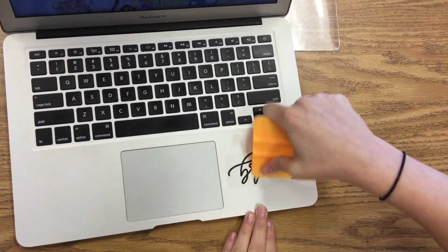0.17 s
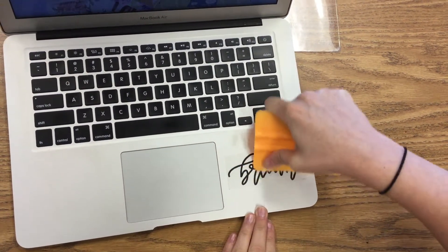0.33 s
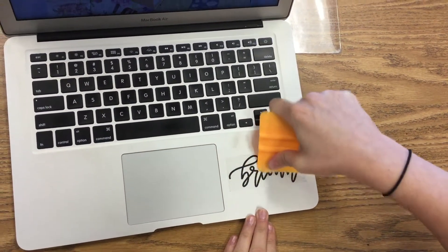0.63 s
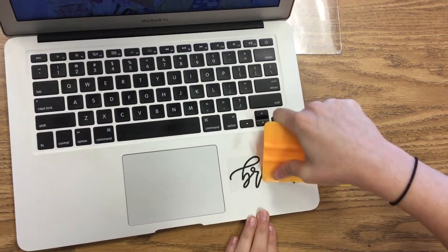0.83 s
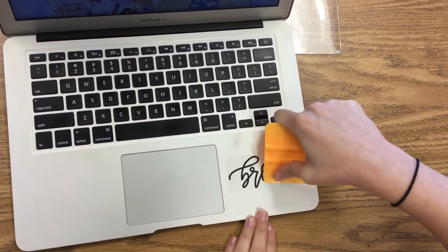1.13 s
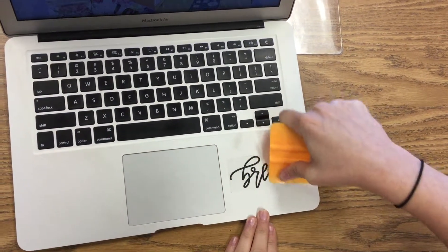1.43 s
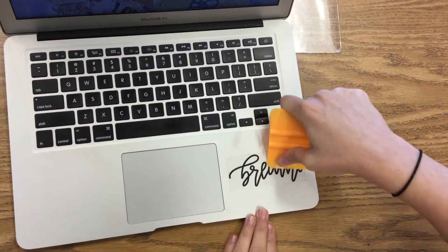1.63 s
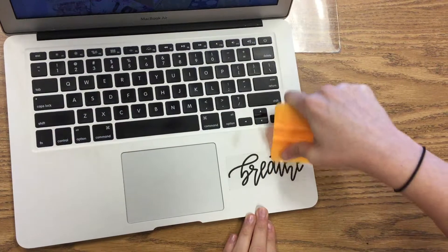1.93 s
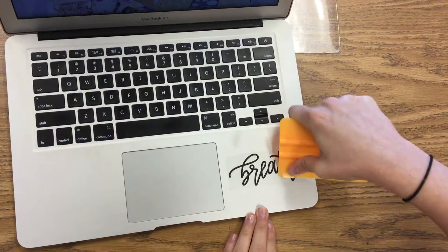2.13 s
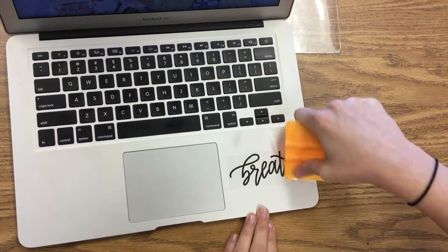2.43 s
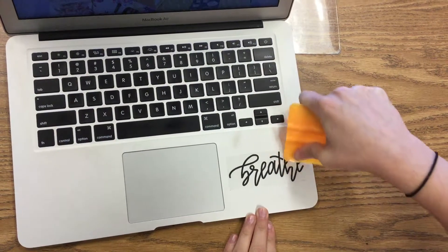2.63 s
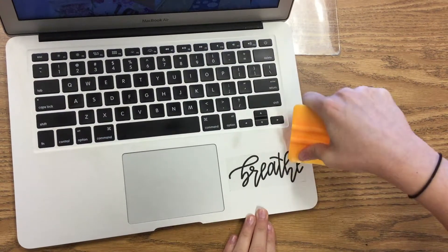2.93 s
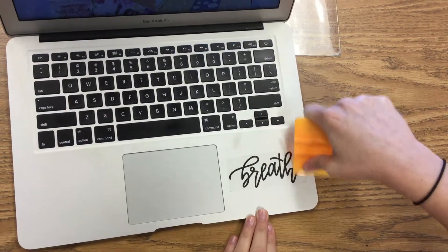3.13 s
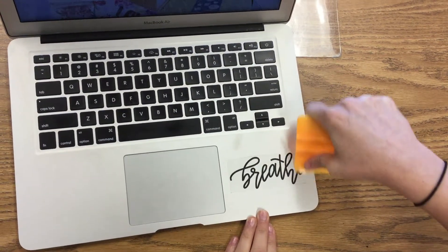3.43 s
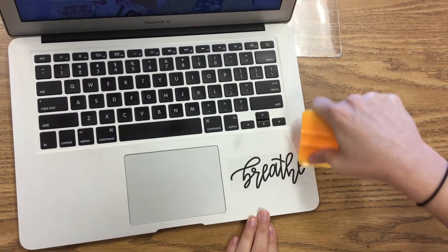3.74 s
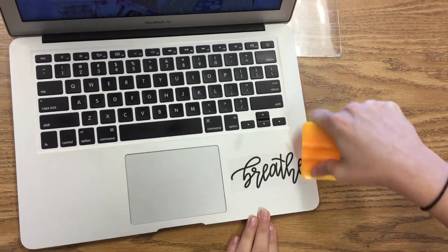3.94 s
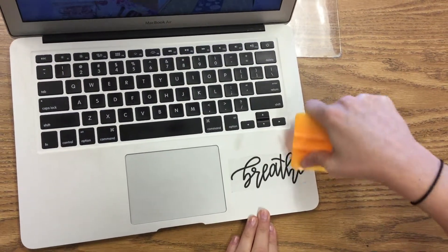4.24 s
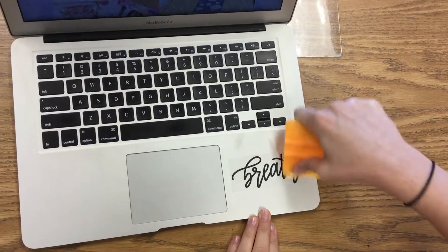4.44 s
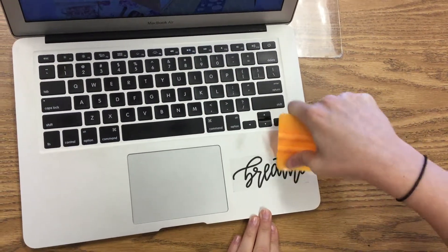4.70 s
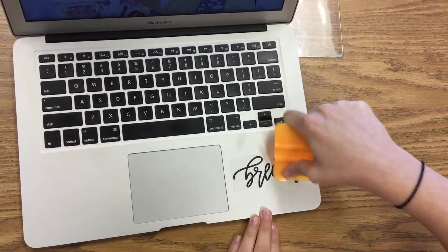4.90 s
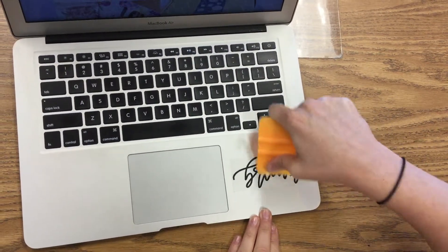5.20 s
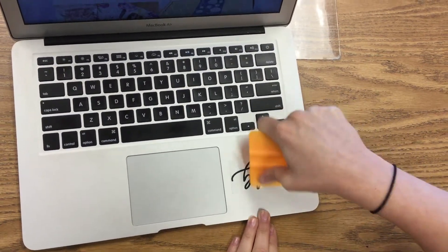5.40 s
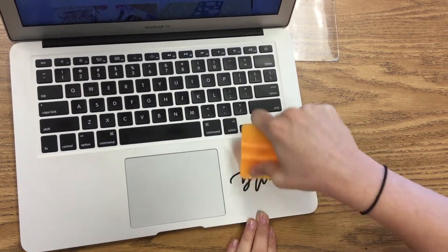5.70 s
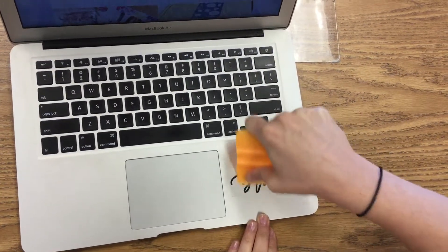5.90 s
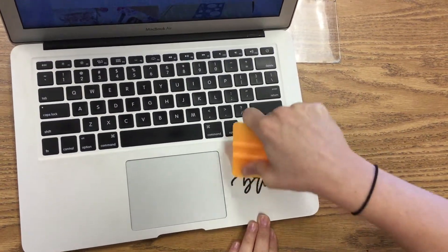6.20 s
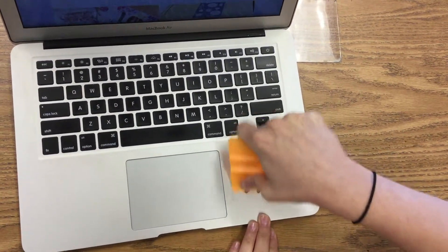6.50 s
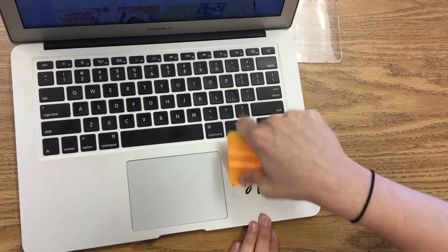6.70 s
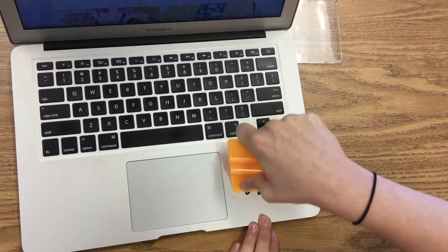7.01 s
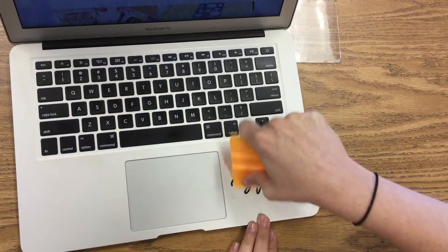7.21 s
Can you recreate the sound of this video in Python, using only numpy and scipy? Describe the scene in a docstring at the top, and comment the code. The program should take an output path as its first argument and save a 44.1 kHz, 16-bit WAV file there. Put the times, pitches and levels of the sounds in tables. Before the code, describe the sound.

Low ventilation rumbles steadily in a small room while a plastic card scrapes over sticker tape on a laptop in quick, uneven strokes. Brief, regular squeaks from the laptop's shell stand out above the soft rasping, along with two light taps and a few thin ticks of tape. The squeaks fade about two thirds of the way through, and firmer rubbing carries on to the end.

```python
"""Ventilation rumbles in a small room throughout. From the start a plastic squeegee card is rubbed
back and forth over transfer tape on a laptop's palm rest, about eight strokes a second: its edge
rasps over the tape's grain and rings the card. From 0.2 s to about 5 s the laptop squeaks under
load and its shell rings. From 0.6 s the tape ticks now and then; at 1.1 and 1.4 s the card taps
down lightly. The rubbing is hardest near 5.6 s and goes on to the end."""
import sys
import numpy as np
from scipy import signal
from scipy.fft import rfft, irfft
from scipy.io import wavfile
from scipy.ndimage import uniform_filter1d

SR = 44100
rng = np.random.default_rng(int(sys.argv[2]) if len(sys.argv) > 2 else 0)


def to_wav(sig):
    """Store sig (one row per channel, or 1-D mono) as 16-bit WAV at the path in sys.argv[1].

    Samples outside -1..1 are clipped; the rate is SR.
    """
    pcm = np.clip(np.atleast_2d(sig), -1, 1) * 32767
    pcm = np.round(pcm).astype(np.int16)
    wavfile.write(sys.argv[1], SR, pcm.T)  # frames by channels


N = 324128
FREQS_HZ = np.maximum(np.fft.rfftfreq(N, 1 / SR), 1)
USUAL_STROKE_DB = -68
# squeaks of the laptop under load: (time [s], level [dB])
SQUEAKS = [(.2000, -46.5), (.4860, -44.5), (0.7688, -42.5), (1.0496, -41.5), (1.3384, -35.5),
           (1.6359, -35.5), (1.9513, -40.5), (2.2738, -42), (2.6142, -43), (2.9475, -44), (3.2572, -41),
           (3.571, -45.5), (3.8762, -45), (4.1738, -46), (5.1241, -52.5)]


def undb(db):
    """Decibels to gain."""
    return 10 ** (np.asarray(db) / 20)


def unit(x):
    """Scale to rms 1."""
    return x / np.sqrt(np.mean(x ** 2))


def shaped(x, gain):
    """Filter by a gain per frequency."""
    return irfft(rfft(x) * gain, N)


def colour(points):
    """Gain per frequency from (frequency [Hz], level [dB]) points."""
    hz, db = np.transpose(points)
    return undb(np.interp(np.log(FREQS_HZ), np.log(hz), db))


def band(lo_hz, hi_hz, order=8):
    """Band-pass gain per frequency."""
    return ((1 + (lo_hz / FREQS_HZ) ** (2 * order)) * (1 + (FREQS_HZ / hi_hz) ** (2 * order))) ** -.5


def walk(rate_hz):
    """Slewed random steps, rms 1."""
    hold = int(SR / rate_hz)
    steps = np.repeat(rng.standard_normal(N // hold + 1), hold)
    return unit(uniform_filter1d(steps, hold)[:N])


def add(track, at_s, sound):
    """Mix a sound into a track."""
    i = max(int(at_s * SR), 0)
    track[i:i + len(sound)] += sound[:N - i]


def ringing(modes, t, rise_s):
    """Modes that build up briefly and die away."""
    ring = sum(undb(db - 60 * t / t60_s) * np.sin(2 * np.pi * (hz * t + rng.random()))
               for hz, db, t60_s in modes)
    return ring * (1 - np.exp(-t / rise_s))


def ventilation(rumble_db=-49.2, air_db=-72.3, swell_share=.7, flutter_db=1.3):
    """A wavering duct rumble under a soft hiss of air."""
    # spectra: (frequency [Hz], relative density [dB])
    rumble_spectrum = [(22, -33), (38, -16.5), (50, -5.5), (66, -0.5), (82, -5.5), (104, 1.5), (130, .5),
                       (160, -8.5), (182, -5), (222, -9.5), (260, -16), (340, -21.5), (450, -33)]
    air_spectrum = [(300, -6), (450, 1.5), (680, 4), (900, -2.5), (1400, -3.5), (2000, -17), (3000, -15.5),
                    (4600, -17.5), (6500, -20.5), (10000, -21.5), (15500, -27.5)]
    # rumble's swell, before centring and scaling: (time [s], level [dB])
    swell = [(0, -50.5), (0.9, -50.5), (1.4, -48.0), (1.7, -48.0), (2.1, -51.0), (2.45, -47.0),
             (2.85, -49.5), (3.2, -47.5), (4.0, -49.0), (4.55, -47.5), (4.85, -52.0), (5.7, -49.0),
             (6.1, -49.0), (6.9, -49.5), (7.15, -48.0), (7.35, -48.5)]
    times_s, db = np.transpose(swell)
    swell_db = swell_share * np.interp(np.arange(N) / SR, times_s, db - db.mean())
    waver_db = swell_db + flutter_db * walk(rate_hz=20)
    rumble = unit(shaped(rng.standard_normal(N), colour(rumble_spectrum) * band(26, 420)))
    air = unit(shaped(rng.standard_normal(N), colour(air_spectrum) * band(300, 16000)))
    return rumble * undb(rumble_db + waver_db) + air * undb(air_db)


def friction(catches_per_s=2500, spread_db=3.5, catch_gain=.42, tremble_db=.8):
    """The edge catches on the tape's grain: tiny uneven slips over hiss, under trembling pressure."""
    catches = (rng.random(N) < catches_per_s / SR) * rng.choice([-1, 1], N)
    sizes = undb(spread_db * np.minimum(rng.exponential(size=N), 5))
    grain = rng.standard_normal(N) + catch_gain * unit(catches * sizes)
    return grain * undb(tremble_db * walk(rate_hz=260))


def stroke_tone(at_s, db, push, body_lag=.3, edge_lag=.2, push_body_db=1.2, push_edge_db=-.8):
    """Body and edge offsets [dB]: both lag the rasp under pressure; a push rings more, hisses less."""
    # tone as the blade crosses the palm rest: (time [s], card body [dB], edge hiss [dB])
    tone = [(0.1, 3.5, -5.5), (.6, 6.3, -4), (1.75, 2.5, -6), (2.0, 0, -2.5), (2.6, -3, -3.5),
            (3.1, -1, -1.5), (3.6, -1.5, -2), (3.8, -2, 3), (4.07, -.5, 3), (4.44, -4.5, -4),
            (5.16, 1.5, -6), (5.42, -1, -6), (5.7, -1, -4), (6.0, -2.5, -9), (6.8, 0, -7), (7.3, -1, -9)]
    times_s, body_db, edge_db = np.transpose(tone)
    harder_db = db - USUAL_STROKE_DB
    return (np.interp(at_s, times_s, body_db) - body_lag * harder_db + push_body_db * push,
            np.interp(at_s, times_s, edge_db) - edge_lag * harder_db + push_edge_db * push)


def card_gain(modes, floor_db, freqs_hz, widen=1.57, detune=.012, contact_db=2.0):
    """The card's resonances; each stroke lands differently, which shifts and reweights them."""
    hz, width_hz, db = np.transpose(modes)
    shift, weight = rng.standard_normal((len(modes), 2)).T
    offset = (freqs_hz[:, None] - hz * (1 + detune * shift)) / (widen * width_hz / 2)
    peaks = undb(db + contact_db * weight) / (1 + offset ** 2)
    return np.sqrt(undb(floor_db) ** 2 + np.sum(peaks ** 2, axis=1))


def stroke_speed(length_s, db, rise_share, drag_share_per_db=.014):
    """The hand speeds up and slows between turning points; drag delays a hard stroke's peak."""
    fastest = np.clip(rise_share + drag_share_per_db * (db - USUAL_STROKE_DB), .1, .9)
    progress = np.linspace(0, 1, int(length_s * SR))
    return np.sin(np.interp(progress, [0, fastest, 1], [0, np.pi / 2, np.pi]))


def screen_echo(x, direction, path_s=.001096, travel_s=.00018, gain=.5):
    """The open screen mirrors the scrape; the path changes as the blade moves, so the colour glides."""
    i = np.arange(len(x))
    lag_s = path_s * rng.uniform(.783, 1.207) + direction * travel_s * np.cos(np.pi * i / len(x)) / 2
    return (x + gain * np.interp(i - lag_s * SR, i, x)) / np.hypot(1, gain)


def squeegee(edge_late_share=.04):
    """Friction rings the card; edge hiss grows faster with speed than the body and peaks later."""
    # draws and pushes in turn, two jerks in the hardest push: (start [s], length [s], level [dB])
    strokes = [(.064, .072, -69.5), (.206, .107, -69), (.315, .117, -70), (.488, .094, -67),
               (.629, .097, -69), (.815, .076, -72.5), (.954, .125, -80), (1.133, .08, -71),
               (1.26, .089, -71.5), (1.432, .102, -69.5), (1.594, .088, -68), (1.77, .113, -73.5),
               (1.949, .08, -66.5), (2.051, .146, -73), (2.25, .075, -69.5), (2.409, .11, -66.5),
               (2.582, .082, -65), (2.716, .1, -68.5), (2.898, .083, -69.5), (3.035, .096, -67.5),
               (3.205, .08, -67.5), (3.333, .096, -68), (3.476, .075, -75.5), (3.629, .081, -75),
               (3.757, .089, -71.5), (3.882, .09, -65.5), (4.013, .084, -71.5), (4.139, .088, -66.5),
               (4.243, .095, -78), (4.403, .083, -59.5), (4.478, .09, -69.5), (4.64, .052, -73.5),
               (4.743, .071, -79), (4.879, .079, -63.5), (4.977, .091, -75.5), (5.135, .082, -69),
               (5.233, .097, -77), (5.381, .08, -58.6), (5.467, .099, -69), (5.63, .078, -58.5),
               (5.677, .027, -56), (5.712, .029, -59.5), (5.728, .066, -62), (5.861, .074, -67),
               (5.96, .09, -71), (6.085, .091, -61), (6.188, .08, -64), (6.303, .092, -64),
               (6.407, .083, -67), (6.533, .083, -60), (6.621, .098, -69.5), (6.76, .083, -63.5),
               (6.872, .089, -66.5), (6.994, .086, -64), (7.131, .062, -70.5), (7.254, .068, -62.5)]
    # card modes by how it bears on the palm rest: (frequency [Hz], nominal width [Hz], level [dB])
    card_flat = [(1750, 650, -4.5), (2150.0, 160, 1.8), (2650, 450, -7.5), (3140, 120.0, -11.5),
                 (3940, 250.0, -11), (4260, 960, -12.5), (5700, 470, -12.5), (8080, 670, -15),
                 (9120.0, 380.0, -16), (11740, 790, -19.5), (15620.0, 3080.0, -18.5)]
    card_at_rim = [(2430, 290, -5.5), (3630, 480, -5.5), (4530, 290, -5.5), (5060, 240, -4),
                   (6240, 310, -5.5), (8200, 320.0, -3), (11500, 590.0, -7.5), (13120.0, 830.0, -7.5),
                   (14770.0, 1000, -8)]
    card_pressed = [(1050, 390, -8), (2110, 400, -2.5), (2780, 230, -3.5), (3410, 210, -1.7),
                    (4220, 490, -0.0), (5330, 500, -4), (5930, 450, -7), (7510.0, 840, -14.5),
                    (8900, 490.0, -9), (12100, 810, -14), (14980.0, 1540.0, -16.4)]
    card_upright = [(1160, 350, -7.5), (1690, 430, -6), (2196, 190, -4.5), (2730, 140, 1),
                    (3695, 560, -0.3), (5050, 130, -3.5), (5660, 540, -6), (7200.0, 330.0, -11),
                    (8230.0, 210.0, -18), (9170, 890.0, -14), (12300, 1380.0, -22)]
    # (start [s], card modes, unresonant floor [dB], rise [share of a usual stroke])
    grips = [(0, card_flat, -23, .61), (2.22, card_at_rim, -11.5, .53),
             (4.37, card_pressed, -17, .38), (5.83, card_upright, -19, .56)]
    out, drive = np.zeros(N), friction()
    freqs_hz = np.fft.rfftfreq(N // 32, 1 / SR)
    bands = band(923, 2847), band(2890, 6800), band(6780, 17000)  # body, rasp, edge
    registers = [np.interp(freqs_hz, FREQS_HZ, gain) for gain in bands]
    for k, (start_s, length_s, db) in enumerate(strokes):
        middle_s = start_s + length_s / 2
        push = 1 if k % 2 else -1
        _, modes, floor_db, rise_share = [grip for grip in grips if grip[0] <= middle_s][-1]
        body_db, edge_db = stroke_tone(middle_s, db, push)
        card = card_gain(modes, floor_db, freqs_hz)
        speed = stroke_speed(length_s, db, rise_share)
        edge_speed = stroke_speed(length_s, db, rise_share + edge_late_share)
        grain = drive[int(start_s * SR):][:len(speed)]
        swells = (undb(body_db - 1) * speed ** .79,
                  undb(-.03) * speed ** 1.23,
                  undb(edge_db + .04) * edge_speed ** 1.43)
        rings = [np.fft.fftshift(irfft(unit(card * register ** 2))) for register in registers]
        scrape = sum(swell * signal.fftconvolve(grain, ring, "same")
                     for swell, ring in zip(swells, rings))
        add(out, start_s, undb(db) * screen_echo(scrape, -push))
    return out


def squeaks(slip_trim_db=-1.2, ring_trim_db=-.3, ring_delay_s=.001003, vary_db=1):
    """Under load the laptop slips twice in about 10 ms; its shell rings on."""
    # tones of one squeak: (delay [s], length [s], pitch [Hz], level [dB])
    slips = [(0, .0065, 1418, -6), (.004, 0.00814, 1440, -.5), (.0048, .005, 1340, -6),
             (-.0006, 0.0046, 2498, -15), (0.0042, 0.0088, 870, -18.5)]
    # (frequency [Hz], level [dB], t60 [s])
    shell_modes = [(350, -30, 0.11), (481, -26, 0.11), (622, -27, 0.12), (900, -32, 0.12),
                   (1216, -17, 0.12), (1324, -21, 0.14), (1674, -30, 0.054), (2130, -32, 0.067),
                   (3500, -27, 0.043), (4260, -24, 0.041), (4540, -27.5, 0.057), (4750, -27, .035)]
    out, t = np.zeros(N), np.arange(SR // 8) / SR
    for at_s, db in SQUEAKS:
        pitch_ratio = 1 + .008 * rng.standard_normal()
        for delay_s, length_s, hz, slip_db in slips:
            swell = np.sin(np.pi * np.minimum(t / length_s, 1)).clip(0) ** .61
            gain = undb(db + slip_db + slip_trim_db + vary_db * rng.standard_normal())
            add(out, at_s + delay_s, gain * swell * np.sin(2 * np.pi * hz * pitch_ratio * t))
        add(out, at_s + ring_delay_s, undb(db + ring_trim_db) * ringing(shell_modes, t, rise_s=.002))
    return out


def shudder(trim_db=-27.8, t60_s=.4, rise_s=.005):
    """Each squeak stirs low modes of laptop and desk, too dense to hear apart."""
    swell, t = np.zeros(N), np.arange(SR // 3) / SR
    for at_s, db in SQUEAKS:
        add(swell, at_s, undb(db + trim_db - 60 * t / t60_s) * (1 - np.exp(-t / rise_s)))
    spectrum = band(400, 1500, order=4) / np.sqrt(FREQS_HZ)
    return swell * unit(shaped(rng.standard_normal(N), spectrum))


def tape_ticks(trim_db=-3, decay_s=.0014):
    """The sticky tape lets go in thin, bright ticks."""
    # (time [s], level [dB])
    releases = [(0.594, -63), (1.362, -51), (1.5349, -58), (1.8612, -57), (5.476, -61), (7.0863, -58)]
    out, t = np.zeros(N), np.arange(SR // 50) / SR
    for at_s, db in releases:
        add(out, at_s, undb(db + trim_db) * np.exp(-t / decay_s) * rng.standard_normal(len(t)))
    return shaped(out, band(7000, 15000, order=2))


def card_taps():
    """As the hand turns, the card drops onto the palm rest and rings briefly."""
    # (time [s], level [dB])
    taps = [(1.096, -70), (1.396, -57.5)]
    # (frequency [Hz], level [dB], t60 [s])
    card_modes = [(740, 4, .03), (1800, -9, .02), (2360, -3.5, 0.095), (2480, -7, .05)]
    out, t = np.zeros(N), np.arange(SR // 8) / SR
    for at_s, db in taps:
        add(out, at_s, undb(db) * ringing(card_modes, t, rise_s=.0006))
    return out


def room(x, wet_db, t60_s=.33, gap_s=.0081, dull_hz=7000):
    """Diffuse reflections of a small room, duller than the direct sound."""
    t = np.arange(SR // 2) / SR
    tail = rng.standard_normal(len(t)) * undb(-60 * t / t60_s) * (t > gap_s)
    wet = signal.fftconvolve(x, tail / np.linalg.norm(tail))[:N]
    return undb(wet_db) * shaped(wet, band(100, dull_hz, order=1))


def scene():
    """Mono mix; the shell spreads more into the room than the blade does."""
    blade = squeegee() + card_taps() + tape_ticks()
    shell = squeaks() + shudder()
    return (blade + room(blade, wet_db=-15.5) + shell + room(shell, wet_db=-14.5) + ventilation())[None]


def record(dry):
    """Steep low-pass."""
    top_hz = 15750
    return signal.sosfilt(signal.ellip(12, .1, 70, top_hz, fs=SR, output="sos"), dry)


dry = scene()
out = record(dry)
to_wav(out)
```